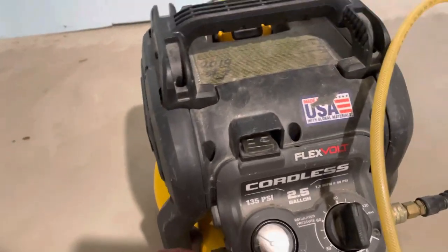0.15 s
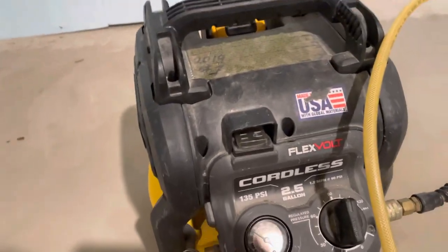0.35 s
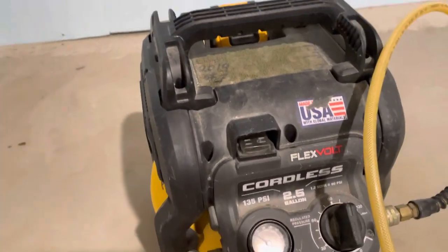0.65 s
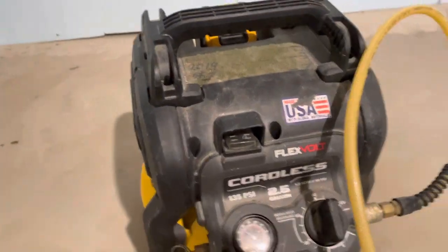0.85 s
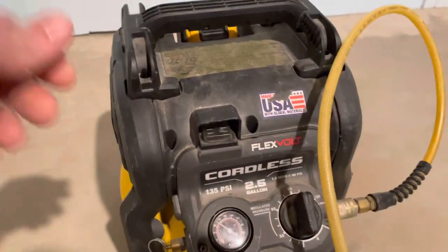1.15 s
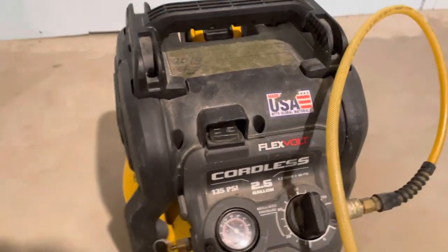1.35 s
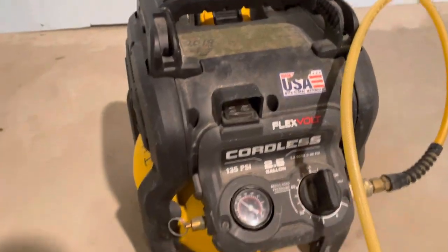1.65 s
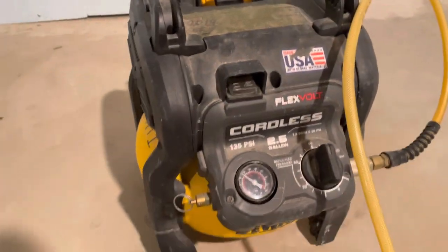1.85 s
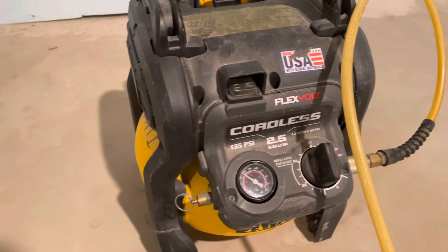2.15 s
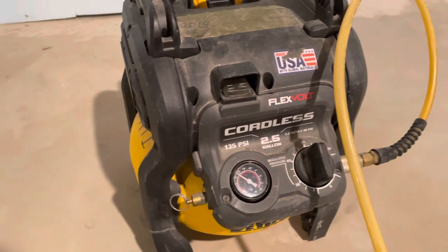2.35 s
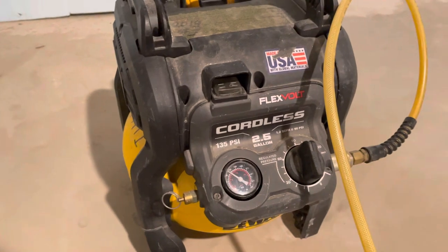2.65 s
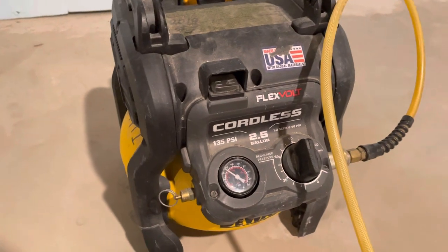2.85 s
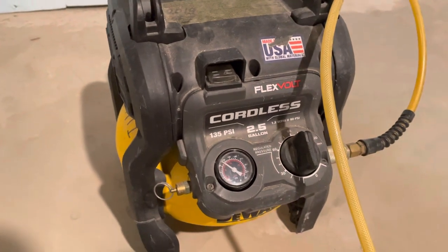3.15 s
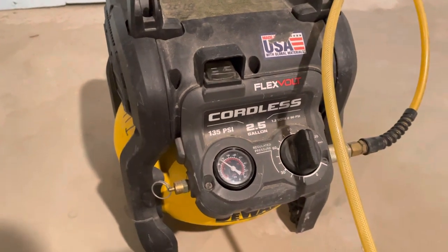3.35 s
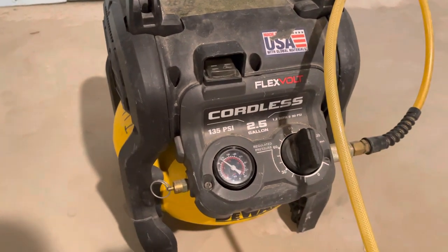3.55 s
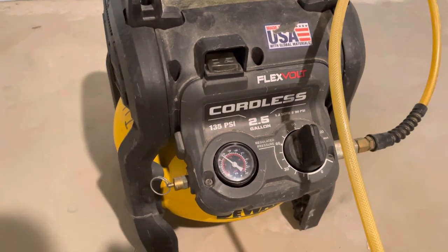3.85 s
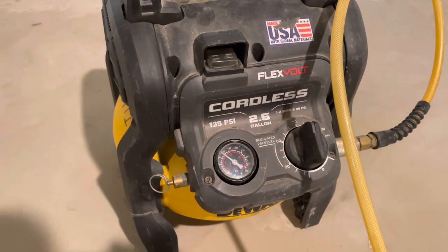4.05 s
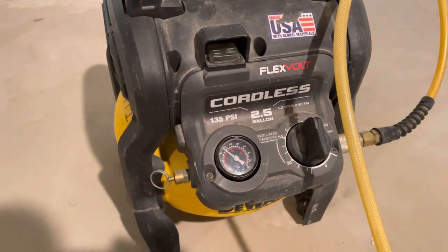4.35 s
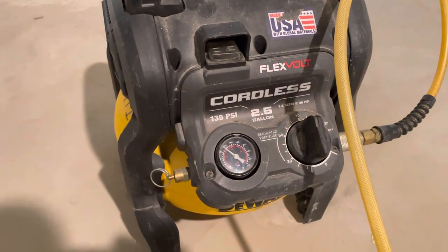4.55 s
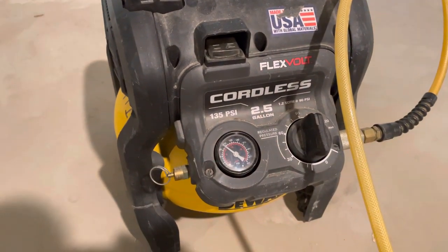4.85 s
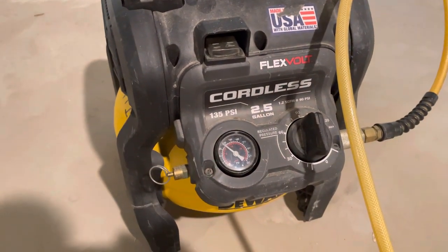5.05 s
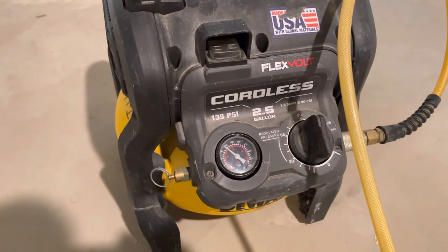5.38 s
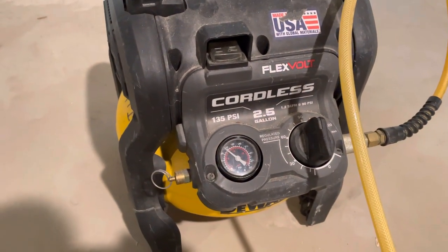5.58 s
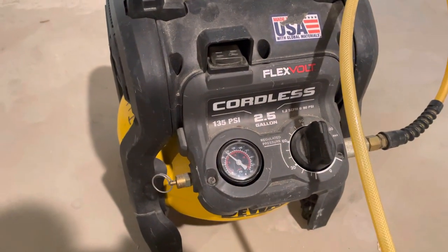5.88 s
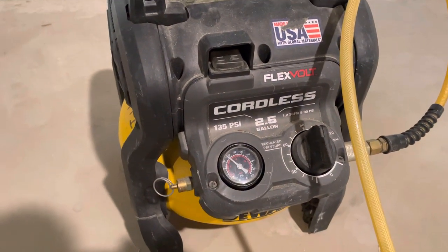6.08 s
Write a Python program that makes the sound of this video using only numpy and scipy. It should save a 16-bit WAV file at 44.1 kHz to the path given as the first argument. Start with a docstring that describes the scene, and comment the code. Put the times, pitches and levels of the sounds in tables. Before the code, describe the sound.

A small battery air compressor runs on a concrete workshop floor, heard at arm's length. It begins as a soft, very fast piston throb with brief buzzes from loose covers. Speed stays constant while the throb, metallic clatter, gear hum and whine steadily build, with rushing air hiss underneath. Different resonances sing out in turn, and it ends loud, still running.

```python
"""A soft, fast piston throb comes first, with loose covers buzzing in bursts, and grows to a loud clatter.
A small cordless compressor fills its tank on a concrete workshop floor, microphone at arm's length.
Its motor holds its speed; once a turn a reed valve flutters, and every part but the buzz gets louder.
Gears, clatter and whine follow the crank, and resonance after resonance sings as the tank fills.
Shaped noise makes the air rushing through the valves and cooling fan; the machine stands slightly left."""
import sys
import numpy as np
from scipy import signal
from scipy.fft import rfft, irfft
from scipy.io import wavfile
from scipy.ndimage import uniform_filter1d

SR = 44100
rng = np.random.default_rng(int(sys.argv[2]) if len(sys.argv) > 2 else 0)


def inscribe(sig):
    """Save sig as 16-bit PCM at rate SR to the path in sys.argv[1].

    A 1-D sig is mono; a 2-D sig holds one channel per row.
    Samples are clipped to [-1, 1] before scaling.
    """
    pcm = np.round(np.clip(np.atleast_2d(sig).T, -1, 1) * 32767)
    wavfile.write(sys.argv[1], SR, pcm.astype(np.int16))


N = 274302
T = np.arange(N) / SR
BINS = np.fft.rfftfreq(N, 1 / SR)
EARS = np.array([[1], [-1]])  # left, right
CRANK_HZ = 56.6

# The drive's strongest tones, each locked to the nearest multiple of crank speed:
# (frequency [Hz], relative level at low pressure [dB], relative level at high pressure [dB])
WHINE_TONES = [(2150, -31.5, -28), (2207, -40, -31), (2434, -29.5, -30), (2490, -31.5, -35),
               (2547, -47, -30.5), (2604, -46, -39), (2716, -36, -31.5), (2886, -45, -34),
               (3000, -28.5, -31), (3170, -41, -36), (3226, -54, -36), (3453, -36.5, -29.5),
               (3575, -39, -33.5), (3622, -49, -39.5), (3736, -38.5, -30.5), (3817, -47, -28),
               (4490, -35.5, -51), (4790, -43, -41.5), (4948, -33.5, -37), (4960, -38.5, -39),
               (5160, -35, -34), (5530, -40.5, -31.5), (5760, -55, -34.5), (5930, -57, -33)]
WHINE_ORDERS = np.round(np.array(WHINE_TONES)[:, 0] / CRANK_HZ)

# Knocks within one turn, as the piston, its link and the valves change direction, each ringing its own part:
# (moment [share of the turn], relative level [dB], frequency [Hz], width [Hz])
TURN_KNOCKS = [(0.056, -4, 5940, 700), (0.065, -9, 1770, 700), (0.315, -1, 2160, 920),
               (0.407, 0, 3780, 990), (0.415, -5, 6850, 1790), (0.585, -3.5, 3000, 1300),
               (0.654, -7, 5080, 790), (0.819, -6.5, 2460, 596), (0.845, 1.5, 5830, 600)]


def undb(db):
    """Decibels to gain."""
    return 10 ** (np.asarray(db) / 20)


def unit(x):
    """Scale to an rms of one."""
    return x / np.sqrt(np.mean(x ** 2))


def read(points, hz):
    """Value of a (Hz, value) table on a log-frequency axis."""
    table_hz, value = np.transpose(points)
    return np.interp(np.log(np.maximum(hz, 1)), np.log(table_hz), value)


def colour(x, points):
    """Filter by a (Hz, dB) table."""
    return irfft(rfft(x) * undb(read(points, BINS)), N)


def walk(rate):
    """Slow chance: a new random level `rate` times a second, joined by lines."""
    steps = rng.standard_normal(2048)
    return 1.12 * np.interp(T * rate + rng.random(), np.arange(len(steps)), steps)


def swell(t, start, end, fade):
    """A plateau in time: rises around `start`, falls around `end`, all in seconds."""
    rise = (1 + np.tanh((t - start) / fade)) / 2
    fall = (1 - np.tanh((t - end) / fade)) / 2
    return rise * fall


def build_up(slack_db, build_s):
    """A shortfall in dB that dies away exponentially from the start."""
    return slack_db * np.exp(-T / build_s)


def noise_band(noise, centre_hz, sigma_hz):
    """Noise kept to a bell-shaped band, at an rms of one."""
    bell = np.exp(-((BINS - centre_hz) / sigma_hz) ** 2 / 2)
    return unit(irfft(rfft(noise) * bell, N))


def knock_force(angle, at, decay_turns=0.068):
    """Force of one knock over a turn (0-1): it starts sharply and dies away."""
    return np.exp(-((angle - at) % 1) / decay_turns)


def knock_shape(angle):
    """Force of all the knocks over one turn."""
    return sum(undb(db) * knock_force(angle, at) for at, db, hz, width in TURN_KNOCKS)


def knock_overtones(ceiling=0.97):
    """One turn of the knocks as overtones of about unit size: each is a short ragged rattle in its own band."""
    angle = np.arange(1024) / 1024
    overtone_hz = np.arange(len(angle) // 2 + 1) * CRANK_HZ
    rattle = 0
    for at, db, hz, width in TURN_KNOCKS:
        burst = rfft(knock_force(angle, at) * rng.standard_normal(len(angle)))
        rattle = rattle + undb(db) * burst / (1 + ((overtone_hz - hz) / (width / 2)) ** 2)
    # even out the spectrum against its neighbourhood, keeping the gaps
    size = abs(rattle) / np.sqrt(uniform_filter1d(abs(rattle) ** 2, size=9))
    return np.minimum(size, ceiling) * np.exp(1j * np.angle(rattle))


def fan():
    """The cooling fan's fine top hiss: turbulence noise in one high band."""
    return noise_band(rng.standard_normal(N), centre_hz=10400, sigma_hz=1300)


def ring_casing(x):
    """Lift each narrow resonance of the pump casing."""
    # Casing resonances that the air rings: (frequency [Hz], width [Hz], lift [dB])
    casing = [(2440, 58, 0), (3180, 57, 8), (3580, 38, 13), (3990, 44, 15.5), (4850, 46, 11),
              (5300, 60, 14), (5710, 30, 17), (6730, 62, 9), (7130, 51, 7.5), (10450, 100, 4)]
    lift_db = sum(db / (1 + ((BINS - hz) / (width / 2)) ** 2) for hz, width, db in casing)
    return irfft(rfft(x) * undb(lift_db), N)


def air(turns, puff=0.084, puff_at=0.37, flicker_db=1.02, tick=0.2):
    """Fan and valve hiss through the casing, swelling a little once a turn and spitting at each knock."""
    # Noise colour of the hiss; near 8.2 kHz the middle drops away deeply, leaving mostly the wide side part:
    # (frequency [Hz], relative level per Hz [dB])
    hiss_colour = [(30, -4), (130, -6), (300, 6), (650, -20), (950, -0.5), (1400, 1.5), (1900, -2.5),
                   (2600, 1.5), (3600, -0.5), (4500, -3), (6800, -6), (7450, -9.5), (8200, -76),
                   (8900, -10.5), (11200, -10.5), (13500, -29)]
    # Side over mid of the hiss, wide around the notch: (frequency [Hz], level difference [dB])
    hiss_width = [(60, -27), (1000, -27), (1600, 9), (4000, -34), (6200, -31), (7450, 13.5), (8200, 18.5),
                  (8900, 16.5), (10300, -25), (11000, -16)]
    mid, side = rng.standard_normal((2, N))
    gate = 1 + puff * np.cos(2 * np.pi * (turns - puff_at)) + tick * knock_shape(turns)
    gate = gate * undb(flicker_db * walk(40))
    stereo = mid + EARS * colour(side, hiss_width)
    return unit(ring_casing(colour(stereo * gate, hiss_colour)))


def buzz(turns, slop_rad=0.3, ears_rad=0.4, fade_s=0.016):
    """Once a turn the drive knocks a loose cover, with uneven force and timing; it rings in a narrow band."""
    # Loose covers that buzz for a while; the bands are 0.54 of the width scale at their -6 dB points:
    # (start [s], end [s], frequency [Hz], width scale [Hz], level [dB], force scatter, either sign [dB])
    covers = [(-0.1, 0.557, 3055, 130, -68, -2.5), (-0.1, 0.22, 1600, 90, -63, 4),
              (0.06, 0.45, 4140, 150, -69, 3), (0.648, 0.96, 4180, 160, -64, 0),
              (0.75, 1.251, 3160, 140, -59.5, 1), (1.42, 1.75, 3590, 110, -61, 2),
              (1.55, 1.72, 3930, 150, -59, 0.5), (1.55, 2.25, 3900, 170, -59, 2.5)]
    out = 0
    for start, end, hz, width, db, scatter_db in covers:
        moments = np.interp(np.arange(2, int(turns[-1]) - 1) + rng.random(), turns, T)
        late, force = rng.standard_normal((len(moments), 2)).T
        late_s = late * slop_rad / (2 * np.pi * hz)
        knocks = np.zeros(N)
        knocks[np.round((moments + late_s) * SR).astype(int)] = undb(scatter_db * force)
        # opposite phase shifts set the two ears apart
        band = np.exp(1j * ears_rad * EARS) / (1 + 1j * (BINS - hz) / (0.27 * width)) ** 2
        ringing = unit(irfft(rfft(knocks) * band, N))
        out = out + undb(db) * swell(T, start, end, fade_s) * ringing
    return out


def drive_tone(turns, k, flicker_db=3.0, jitter=0.3, smear=3.2, stray=0.73, beam_hz=1450):
    """One multiple of crank speed, unsteady from play in the drive; short waves reach the ears out of step."""
    # jitter, smear and stray scale phase offsets [rad]
    apart = stray * (k * CRANK_HZ > beam_hz) * np.tanh(2 * walk(0.49)) * EARS
    phase = 2 * np.pi * (k * turns % 1) + smear * rng.standard_normal() + jitter * walk(45) + apart
    return np.sqrt(2) * undb(flicker_db * walk(14)) * np.cos(phase.astype(np.float32))


def knock_tone(turns, knocks, k, flicker_db, jitter):
    """A drive tone timed so that it joins its neighbours in the knocks."""
    timed_turns = turns + np.angle(knocks[k]) / (2 * np.pi * k)
    return drive_tone(timed_turns, k, flicker_db, jitter, smear=0)


def singing_db(hz):
    """Lift that a drive tone gets while a resonance near its multiple of crank speed sings."""
    # Resonances that the drive excites in turn as the tank fills, moved to the nearest multiple of crank speed:
    # (start [s], end [s], fade [s], frequency [Hz], width [Hz], lift [dB])
    resonances = [(0.9, 1.43, 0.11, 2434, 60, 11), (0.847, 1.65, .1, 4981, 40, 10),
                  (1.12, 1.85, .12, 4528, 70, 12), (1.2, 3.6, .15, 4811, 50, 12.5),
                  (1.4, 3.8, .15, 3736, 60, 8), (2.154, 2.8, .08, 5207, 90, 9),
                  (2.35, 3.056, 0.18, 4924, 60, 13.5), (2.8, 4.72, 0.35, 3453, 60, 10),
                  (2.9, 3.75, 0.15, 2434, 40, 5.5), (3.4, 4.4, 0.28, 2547, 70, 9),
                  (3.3, 4.4, .2, 2604, 50, 5.5), (3.1, 5.1, 0.13, 4981, 40, 11.5),
                  (4.5, 5.8, 0.26, 5717, 70, 11), (4.6, 6.05, .2, 3226, 40, 9),
                  (5.083, 6.4, 0.13, 3622, 24.8, 18.5), (5.802, 6.4, .15, 3736, 50, 2)]
    t = T[::64]  # the lift moves slowly, so a coarse time grid will do
    lift = 0
    for start, end, fade, centre, width, db in resonances:
        locked_hz = np.round(centre / CRANK_HZ) * CRANK_HZ
        nearness = 1 / (1 + ((hz - locked_hz) / (width / 2)) ** 2)
        lift = lift + db * swell(t, start, end, fade) * nearness
    return np.interp(T, t, lift)


def gears(turns, load, mesh_at=0.35):
    """Gear hum, partly repeating only every second turn, changes colour as the piston's load comes on."""
    # Gear tones: (multiple of crank speed, relative level lightly loaded [dB], relative level fully loaded [dB])
    gear_tones = [(14.5, -55, -54), (15.5, -63, -68), (16, -50, -61), (16.5, -65, -69), (17, -52, -56),
                  (17.5, -58, -64), (18, -56, -47), (18.5, -60, -62), (19, -55, -54), (19.5, -56, -56),
                  (20, -71, -61), (20.5, -69, -72), (21, -57, -60), (21.5, -51, -53), (22, -59, -66),
                  (22.5, -66, -65), (23, -51, -58), (23.5, -61, -62), (24, -57, -55), (25, -60, -50),
                  (26, -71, -60), (28, -52, -49.5), (29, -62, -46.5), (30, -63, -58), (31, -60, -68),
                  (33, -57, -52.5), (37, -66, -59)]
    out = 0
    for k, light_db, full_db in gear_tones:
        gain = undb(light_db + load * (full_db - light_db))
        out = out + gain * drive_tone(turns - mesh_at, k, flicker_db=0.7, jitter=0.27, smear=1.0)
    return out


def clatter(turns, knocks, patchy_db=6.5, flicker_db=3.3, jitter_per_khz=0.13):
    """Knocks repeating every turn make a dense ragged comb between the whines, less exact towards the top."""
    # The drive's clatter: (frequency [Hz], relative level [dB])
    clatter_colour = [(1920, -4), (1990, -30), (2100, -1), (2900, 9), (3300, 5.5), (3850, -3), (4300, 4),
                      (4700, 1), (5200, 6), (5900, -2), (6300, 2), (7400, -11)]
    out = 0
    for k in np.setdiff1d(np.arange(34, 130), WHINE_ORDERS):
        hz = k * CRANK_HZ
        db = read(clatter_colour, hz) + singing_db(hz) + patchy_db * np.tanh(walk(0.88))
        tone = knock_tone(turns, knocks, k, flicker_db, jitter_per_khz * hz / 1000)
        out = out + undb(db) * abs(knocks[k]) * tone
    return unit(out)


def whine(turns, knocks, waver_db=1.1, pressure_from_s=0.48, pressure_full_s=3.3):
    """The drive's strongest tones shift in weight with pressure; each swells while its resonance sings."""
    pressure = np.interp(T, [pressure_from_s, pressure_full_s], [0, 1])
    out = 0
    for k, (hz, low_db, high_db) in zip(WHINE_ORDERS, WHINE_TONES):
        db = low_db + pressure * (high_db - low_db) + singing_db(k * CRANK_HZ) + waver_db * walk(1.55)
        out = out + undb(db) * knock_tone(turns, knocks, int(k), flicker_db=1.0, jitter=0.2)
    return out


def stroke(angle, open_share=0.645, push_at=0.675, early=0.435):
    """Air flow over one turn (0-1): gentle as the valve lifts, full late in the stroke, then shut."""
    travel = angle / open_share
    return (travel < 1) * (early + (1 - early) / (1 + np.exp(-(travel - push_at) * 20)))


def valve_rasp(turns, linger=0.36):
    """Turbulence in the open valve rasps near the reed's flutter, new on every stroke, lingering between."""
    gusts = rng.standard_normal(N) * (linger + stroke(turns % 1))
    return noise_band(gusts, centre_hz=630, sigma_hz=170)


def valve_burst(flutter_hz=688, gulp=0.14, gulp_turns=0.175):
    """One turn of the valve, as overtones: a soft gulp around its opening, then the reed's flutter."""
    angle = np.arange(1024) / 1024
    flutter = stroke(angle) * np.sin(2 * np.pi * flutter_hz / CRANK_HZ * angle)
    from_opening = (angle + 0.5) % 1 - 0.5
    return -rfft(flutter + gulp * np.exp(-(from_opening / gulp_turns) ** 2))


def pump(turns, load, ring_db, thump_db, thump_top_hz=480, waver_db=0.24, weak_waver=0.023,
         push_from_s=0.26, push_full_s=0.88, early_push_db=-4, limp=0.022, stroke_db=0.44):
    """The reed flutters while air flows; the housing weights each overtone of that repeating burst."""
    # What the housing passes at low pressure: (multiple of crank speed, relative level [dB])
    housing_light = [(1, -16), (2, -17), (3, -34.5), (4, -8.5), (5, -9.5), (6, -33), (7, -11), (8, -12),
                     (9, -5), (10, 3), (11, 2.5), (12, 4.5), (13, -5), (14, -8.5), (15, -33)]
    # What it passes at high pressure: (multiple of crank speed, relative level [dB])
    housing_full = [(1, -14), (2, -15.5), (3, -28.5), (4, -8.5), (5, -6.5), (6, -27.5), (7, -15.5),
                    (8, -12), (9, -15.5), (10, 1.5), (11, 0.5), (12, 4.5), (13, -10.5), (14, -6.5),
                    (15, -23)]
    burst = valve_burst()
    light_db, full_db = np.array(housing_light)[:, 1:], np.array(housing_full)[:, 1:]
    gains = undb(light_db + load * (full_db - light_db))
    orders = np.arange(1, len(gains) + 1)
    low = orders * CRANK_HZ < thump_top_hz
    # the low overtones (thump) and the rest (ring) each get a level of their own
    thump = undb(thump_db) / np.linalg.norm(gains[low], axis=0)
    ring = undb(ring_db) / np.linalg.norm(gains[~low], axis=0)
    # the two deepest overtones start weaker and reach full level within the first second
    push = undb(np.interp(T, [push_from_s, push_full_s], [early_push_db, 0]))
    out = 0
    for k, gain, is_low in zip(orders, gains, low):
        size = gain * undb(waver_db * walk(22)) * (push if k <= 2 else 1)
        size = size + weak_waver * k / len(gains) * walk(25)
        overtone = np.cos(2 * np.pi * k * turns + np.angle(burst[k]))
        out = out + size * (thump if is_low else ring) * overtone
    # the gearing makes every second stroke a little stronger, and no two strokes push alike
    return np.sqrt(2) * out * (1 + limp * np.cos(np.pi * turns)) * undb(stroke_db * walk(CRANK_HZ))


def place(x):
    """The machine stands slightly left of the microphone, by a level difference for each frequency."""
    # Left minus right: (frequency [Hz], level difference [dB])
    balance = [(60, 1.5), (110, 1.0), (200, 0), (360, 5), (660, 2.0), (1190, -0.5), (2170, 0), (3950, 8),
               (7180, 0), (13000, 0.5)]
    return irfft(rfft(x) * undb(EARS * read(balance, BINS) / 2), N)


def scene(start_angle=0.585, wander_turns=0.0027, shake_turns=0.00014, load_from_s=0.71, load_full_s=1.8,
          piston_db=-6.5, rasp_db=-22, gear_db=23, clatter_db=-22.0, air_db=-18.0, fan_db=-40):
    """All parts but the buzzing covers rise with one loudness curve; all but the fan follow one crank."""
    # Overall loudness, rising throughout: (time [s], level of the valve's ring [dB])
    loudness = [(0.05, -37.5), (0.64, -36), (4.23, -26.5), (6.15, -23)]
    loudness_db = np.interp(T, *np.transpose(loudness))
    # these parts start further below their working level
    thump_db = loudness_db + build_up(slack_db=-12.5, build_s=0.32)
    drive_db = loudness_db + build_up(slack_db=-17, build_s=0.9)
    hiss_db = loudness_db + build_up(slack_db=-3.5, build_s=0.85)
    turns = CRANK_HZ * T + start_angle + wander_turns * walk(1.457) + shake_turns * walk(46)
    load = np.interp(T, [load_from_s, load_full_s], [0, 1])
    knocks = knock_overtones()
    machine = undb(loudness_db + fan_db) * fan()
    machine = machine + undb(hiss_db + air_db) * air(turns)
    machine = machine + buzz(turns)
    machine = machine + undb(loudness_db + gear_db) * gears(turns, load)
    machine = machine + undb(drive_db + clatter_db) * clatter(turns, knocks)
    machine = machine + undb(loudness_db) * whine(turns, knocks)
    machine = machine + undb(loudness_db + rasp_db) * valve_rasp(turns)
    machine = machine + pump(turns, load, loudness_db, thump_db + piston_db)
    return place(machine)


def record(dry, top_hz=13600):
    """The phone cuts the top with a steep low-pass."""
    return signal.sosfilt(signal.ellip(8, 0.2, 70, top_hz, fs=SR, output="sos"), dry)


dry = scene()
out = record(dry)
inscribe(out)
```